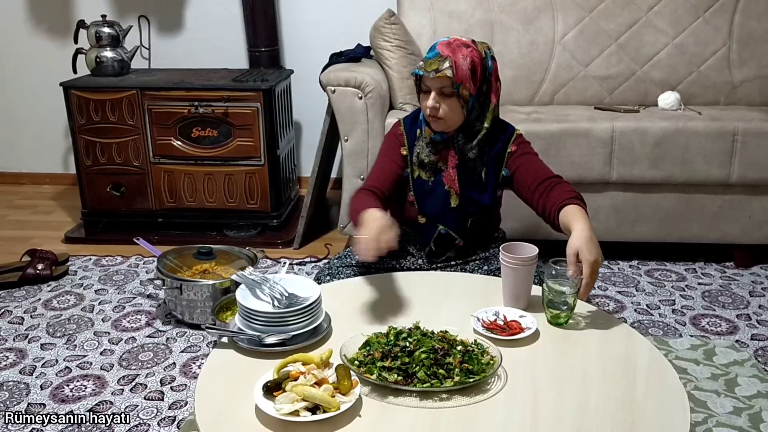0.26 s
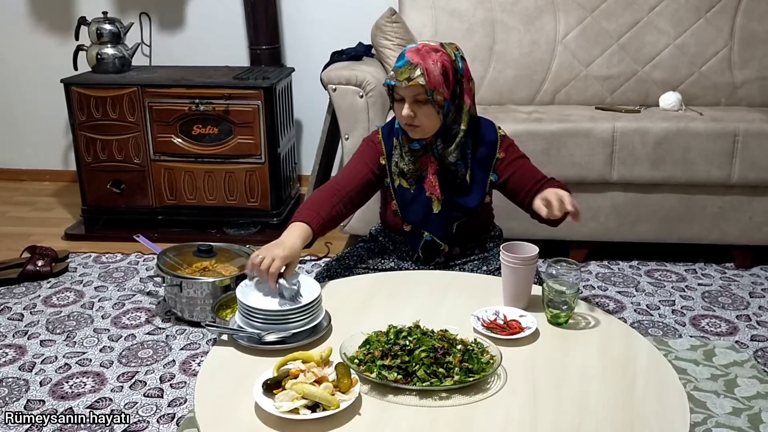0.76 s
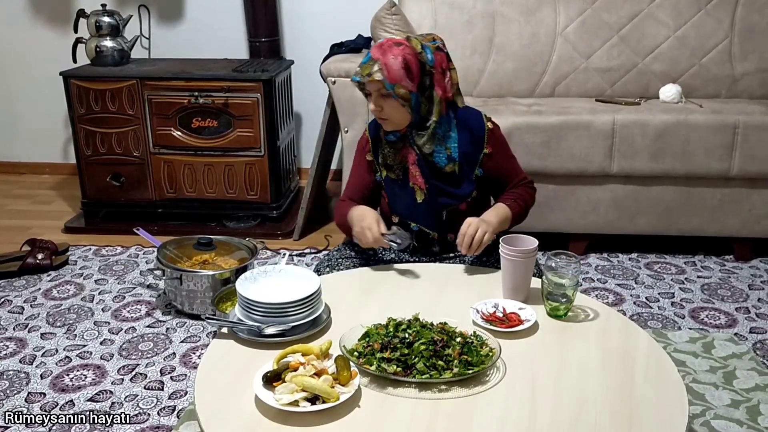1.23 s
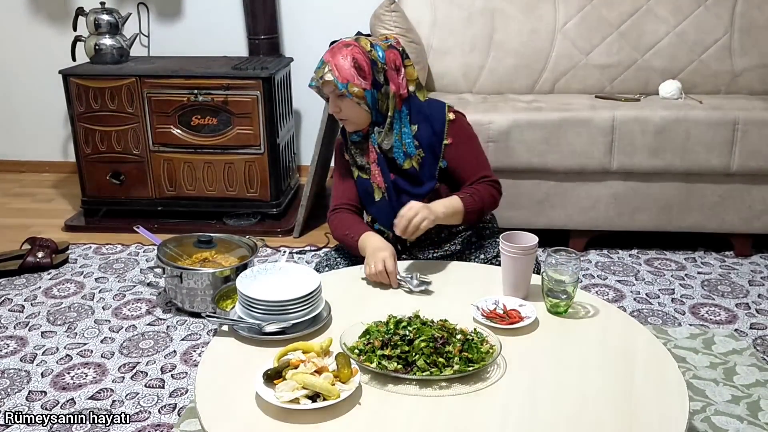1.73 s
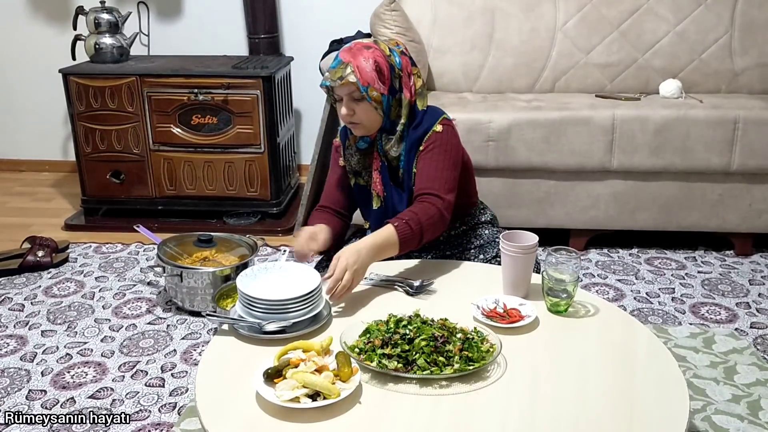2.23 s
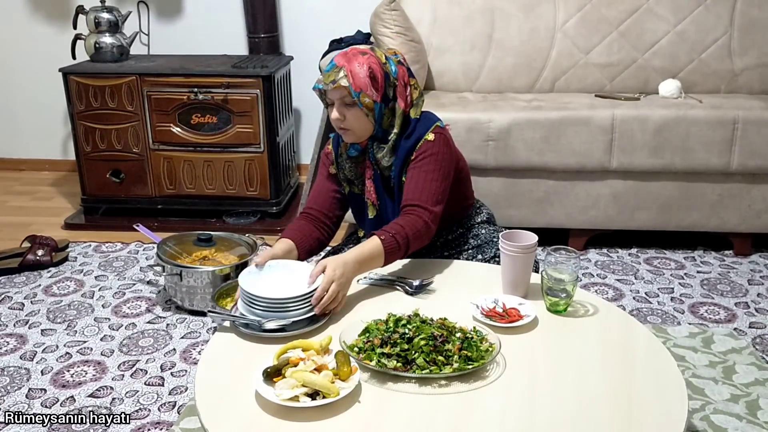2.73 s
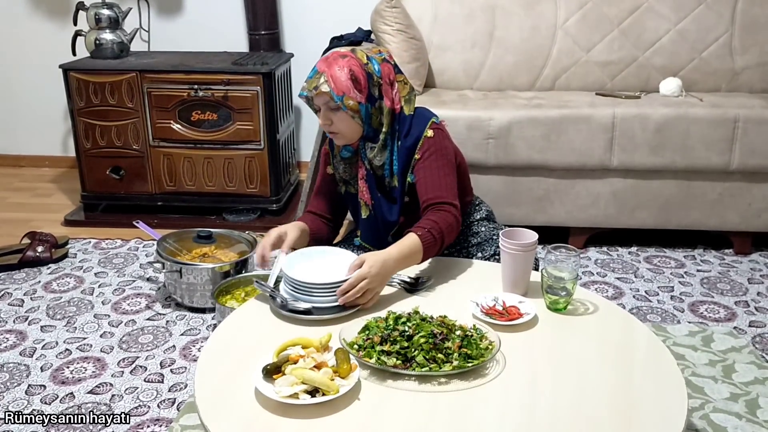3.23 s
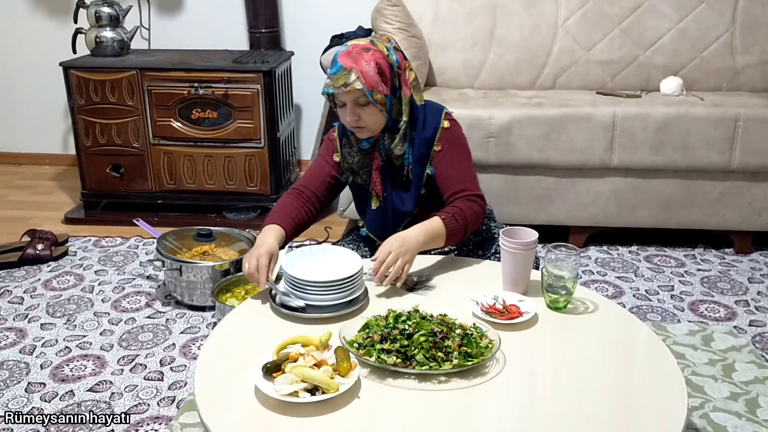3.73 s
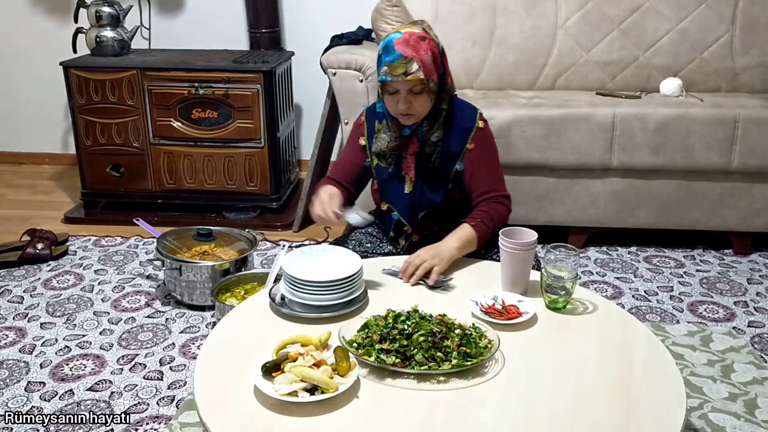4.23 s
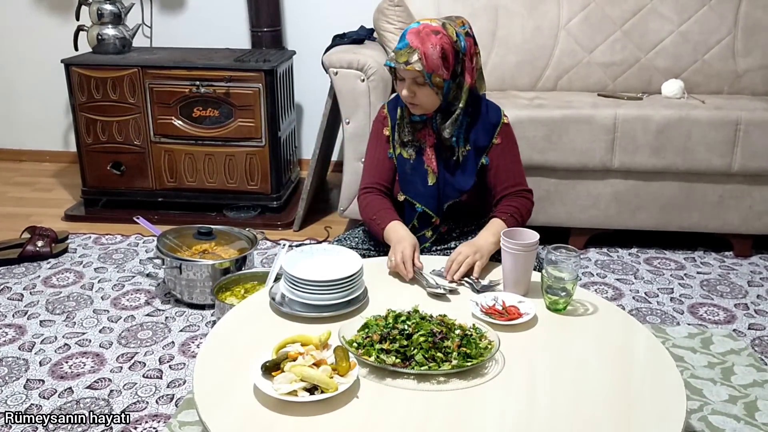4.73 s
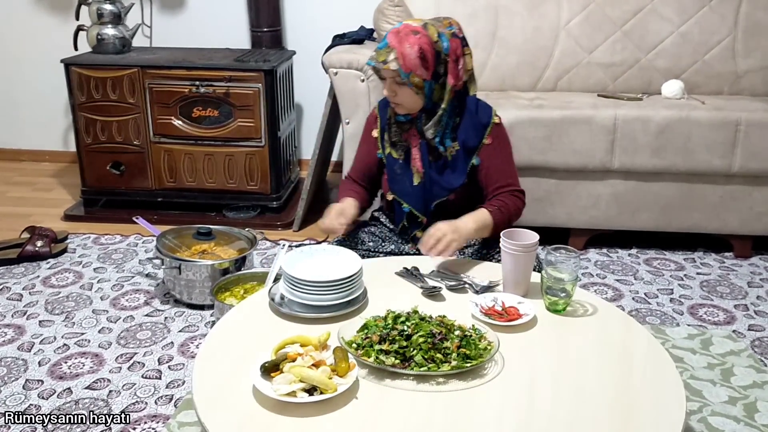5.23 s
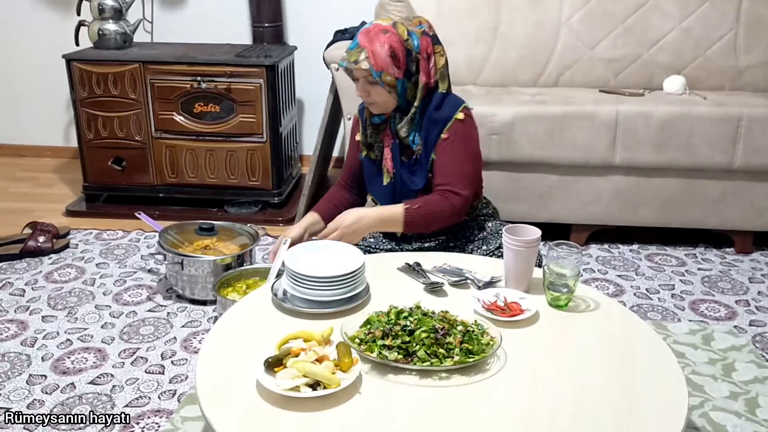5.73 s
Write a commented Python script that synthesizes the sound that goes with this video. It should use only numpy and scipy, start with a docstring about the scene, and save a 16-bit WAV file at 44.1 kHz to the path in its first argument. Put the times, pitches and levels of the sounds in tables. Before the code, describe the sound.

In a quiet carpeted living room, a cup and a glass knock on a low wooden table. A fistful of cutlery is scooped off a plate with a bright jangle, then dropped in several hard clacks. A stack of plates slides softly, a spoon scrapes free, and the cutlery is sorted with ringing clatter. One close microphone, short room echo, faint hiss.

```python
"""Laying tableware on a low table

One microphone in a carpeted room, near a low wooden table. A cup and a glass knock, a fistful of cutlery
is scooped off a plate, dropped and sorted, a stack of plates slides and a spoon is drawn off the tray.
Each contact is a burst of tiny impacts that thumps the surface, rasps on it and rings what is moved.
Blows, clinks, ticks, hums and a groan are added over room tone. Table levels are before the mix in scene()."""
import sys
import numpy as np
from scipy import signal
from scipy.io import wavfile
from scipy.ndimage import uniform_filter1d

SR = 44100
rng = np.random.default_rng(int(sys.argv[2]) if len(sys.argv) > 2 else 0)


def generate_wav(sig):
    """Save sig (samples, or channels by samples) to the path in sys.argv[1] as 16-bit PCM at SR."""
    pcm = np.round(np.clip(np.atleast_2d(sig).T, -1, 1) * 32767).astype(np.int16)
    wavfile.write(sys.argv[1], SR, pcm)


N = 263277  # length, samples


def amp(db):
    """Decibels to amplitude."""
    return 10 ** (np.asarray(db) / 20)


def unit(x):
    """Scales to energy 1."""
    return x / np.sqrt(np.sum(x ** 2) + 1e-20)


def read(points, hz):
    """Reads a table of (hz, value) along a logarithmic frequency axis."""
    f, value = np.transpose(points)
    return np.interp(np.log(hz + 1), np.log(f + 1), value)


def played(x, response):
    """Sends a signal through an impulse response."""
    return signal.oaconvolve(x, response)[:N]


def bandpass(x, order, band_hz):
    """Keeps one band of a signal."""
    return signal.sosfilt(signal.butter(order, band_hz, "band", fs=SR, output="sos"), x)


def colour(points, size=2048):
    """Causal, minimum-phase response with the given spectrum, at energy 1."""
    level_db = np.maximum(read(points, abs(np.fft.fftfreq(size, 1 / SR))), -100)
    log_gain = np.log(amp(level_db))
    response = np.fft.ifft(np.exp(np.conj(signal.hilbert(log_gain)))).real
    return unit(response[:size // 2])


def ring(modes):
    """Dying sines of three like pieces, slightly out of tune; a wide resonance dies fast and starts stronger."""
    hz, width, db = np.transpose(modes)[:, :, None]
    t = np.arange(SR // 4) / SR
    pieces = sum(np.sin(2 * np.pi * (hz + step * width) * t) for step in (-1, 0, 1))
    sound = (amp(db) * width * np.exp(-np.pi * width * t) * pieces).sum(0)
    no_bass = signal.butter(2, 1500, "high", fs=SR, output="sos")  # small things radiate no bass
    return unit(signal.sosfilt(no_bass, sound))


def impacts(per_s, spread_db):
    """Tiny impacts at random moments, a few of them larger; mean power 1."""
    size = amp(spread_db * np.minimum(rng.exponential(1, N), 4)) * rng.choice([-1., 1.], N)
    happens = rng.random(N) < per_s / SR
    return np.sqrt(N) * unit(size * happens)


RISE_POWER = 0.64  # shape of the rise, 1 = straight
# How fast each layer dies: one factor on the fall for thump, rasp and ring
FALL_PACE = [
    [0.86],
    [0.76],
    [.95],
]


def stroke(t, start, rise, hold, fall_db, *levels_db):
    """Rise, hold and fall of one contact's force, each layer dying at its own pace."""
    age = t - start
    fading_db = np.maximum(age - rise - hold, 0) * fall_db * np.array(FALL_PACE)
    return np.clip(age / rise, 0, 1) ** RISE_POWER * amp(np.array(levels_db)[:, None] - fading_db)


def contact(rows, surface, modes, clatter, ring_share, per_s):
    """Impacts shaped by each stroke drive the surface, low and high, and the moved thing."""
    t, power = np.arange(SR) / SR, np.zeros((3, N + SR))
    for start, *row in rows:
        power[:, round(start * SR):][:, :SR] += stroke(t, 0, *row) ** 2
    thump, rasp, jangle = np.sqrt(power[:, :N]) * impacts(per_s, spread_db=1.5)
    # the moved thing: pitched ring and unpitched clatter, shared by power
    thing = np.sqrt(ring_share) * ring(modes)
    thing[:1024] += np.sqrt(1 - ring_share) * colour(clatter)
    return played(thump, colour(surface[0])) + played(rasp, colour(surface[1])) + played(jangle, thing)


# Room tone: hz, level_db per Hz (shape only)
HISS = [(18, -30), (30, -1), (197, -13), (256, -15), (432, -22.5), (492, -21), (546, -26), (622, -21.5),
        (1680, -27.5), (2490, -28.5), (6540, -37), (15500, -36.5)]
HISS_DB = -70.5  # room tone level
WANDER_DB, RUMBLE_DB = -66.5, -79  # very low wander and low rumble at rest
# Swells added to the resting levels: centre_s, half_width_s, wander_db, rumble_db
SWELLS = [(.8, 0.13, -50, -78.5), (2.2, 0.46, -70, -69), (3.04, 0.038, -52, -72), (4.12, 0.13, -62, -84),
          (4.62, .1, -54.5, -75), (5.14, 0.19, -44, -66.5), (5.521, 0.18, -50.5, -61)]


def background():
    """Steady noise for room tone; a very low, near inaudible wander and a low rumble that swell at times."""
    out = amp(HISS_DB) * played(rng.standard_normal(N), colour(HISS, size=8192))
    centre, half, *levels = np.transpose(SWELLS)[:, :, None]
    bells = np.exp(-((np.arange(N) / SR - centre) / half) ** 2)
    for rest_db, db, band_hz in zip((WANDER_DB, RUMBLE_DB), levels, ([1.5, 10], [32, 58])):
        low = bandpass(rng.standard_normal(N), 3, band_hz)
        level = amp(rest_db) + (amp(db) * bells).sum(0)
        out += np.sqrt(N) * unit(low) * level
    return out


# Cup and glass: start_s, rise_s, hold_s, fall_db_per_s (before FALL_PACE), thump_db, rasp_db, ring_db
CUP_STROKES = [(0.0, 0.00033, .001, 397, -42, -40.5, -55), (.121, 0.0019, .001, 253.5, -40.5, -37.5, -51),
               (.124, 0.006, 0.0089, 457, -49.5, -39, -35), (.224, 0.0017, 0.0067, 356, -38.5, -41.5, -72)]
# Surface under them, a thump list then a rasp list: hz, level_db per Hz (shape only)
STAND = [(59, -46.5), (100, -18.5), (214, -1.5), (393, -10.5), (445, -4), (540, -2.5), (606, 1),
         (1000, -12.5), (1300, -46), (2200, -120)], [(530, -16), (900, -10.5), (1040, -7.5), (1180, -9.5),
         (1680, -8), (2330, -2), (2800, -4), (3200, -17), (4160, -21.5), (7040, -120)]
# Their ring: hz, width_hz, level_db (shape only, weighted by width in ring())
CUP_MODES = [(5130, 32, 2.5), (5530, 28, -17), (5820, 260, -12.5), (7580, 110, -13), (8420, 43, -7.5),
             (10460, 39, -23.5), (12040, 50, -17), (12500, 80, -20), (12930, 37, -11), (13500, 25, -4),
             (15030, 94, -26.5), (15270, 90, -39)]
# Their unpitched clatter: hz, level_db per Hz (shape only)
CUP_CLATTER = [(1940, -37), (3300, -21), (5090, -3), (6810, -19.5), (7650, -2), (9790, -26.5), (13100, -6),
               (15500, -30)]


def cups():
    """A cup and a glass knock: very quick strokes, mostly pitched ring in the moved thing."""
    return contact(CUP_STROKES, STAND, CUP_MODES, CUP_CLATTER, ring_share=0.69, per_s=4000)


# Short pitched clinks and knocks that stand out of the clatter: start_s, pitch_hz, width_hz, level_db, t60_s
CLINKS = [(.0, 2747, 62, -43.5, 0.12), (.128, 2414, 173.6, -28, 0.21), (.14, 2460, 102, -25, 0.084),
          (.127, 708, 76, -39, 0.19), (.688, 840, 60, -54, .2), (.71, 892, 90, -43, 0.35),
          (.728, 5250, 109, -26.5, 0.09), (.728, 7240, 64.8, -23.5, 0.054), (1.706, 7410, 100, -70.5, .2),
          (1.814, 1620, 142, -34.5, 0.21), (1.814, 716, 123.1, -39, 0.064), (1.878, 1580, 140, -36.5, 0.11),
          (1.969, 2814, 374, -25, 0.082), (1.975, 7430, 93, -41, .12), (2.035, 5780, 86.4, -40.5, 0.086),
          (2.093, 1415, 96, -33, 0.12), (2.1, 155, 30, -57, 0.36), (2.15, 476, 28.7, -36.5, 0.12),
          (2.77, 890, 121, -52.5, 0.12), (2.76, 7850, 120, -67, 0.068), (3.139, 481, 50, -48, .1),
          (3.43, 651, 112.2, -50, 0.068), (3.672, 844, 91, -42.5, 0.082), (3.77, 3450, 153, -48, 0.34),
          (3.81, 2476, 152, -44.5, 0.23), (3.83, 3686, 163, -45, 0.22), (4.07, 1633, 102, -31, 0.089),
          (4.05, 11200, 148, -37, 0.41), (4.07, 7450, 83, -38, 0.19), (4.35, 3150, 129, -40, 0.4),
          (4.45, 2340, 223.6, -38.5, 0.48), (4.612, 9600, 140.4, -42, 0.089),
          (4.659, 3440, 248, -30.5, 0.049), (4.712, 2660, 481.5, -33, 0.048),
          (4.715, 330, 40, -47.5, 0.094), (4.81, 321, 56, -38, 0.06), (4.929, 2960, 433, -21.5, 0.053),
          (4.94, 4800, 30, -45, 0.505), (4.95, 8740, 62.04, -47, 0.84), (5.011, 3200, 121, -33, .1),
          (5.05, 7780, 61.11, -34, 0.31), (5.469, 120, 35, -61, 0.42)]


def clinks():
    """Each is a cluster of ten close tones that starts fast and dies, like a damped mode shaken for a moment."""
    out, t = np.zeros(N), np.arange(SR // 3) / SR
    spreads = rng.uniform(-1, 1, (len(CLINKS), 2, 10, 1))
    for (start, hz, width, db, t60), (detune, phase) in zip(CLINKS, spreads):
        tones = np.sin(2 * np.pi * (hz + width * detune) * t + np.pi * phase).sum(0) / np.sqrt(5)  # mean power 1
        out[round(start * SR):][:len(t)] += amp(db - 60 * t / t60) * (1 - np.exp(-t / 0.0017)) * tones
    return out


# Carpeted room: hz, t60_s
ROOM = [(200, .45), (700, 0.33), (2000, 0.28), (5000, 0.31), (12000, 0.26)]


def room(x):
    """Sparse echoes of random sign, each band dying at its own speed."""
    taps = np.zeros(SR // 2)
    slots = np.arange(100, len(taps) - 12, 12)  # one echo in every 12 samples
    taps[slots + rng.integers(0, 12, len(slots))] = rng.choice([-1., 1.], len(slots))
    hz, t, bands = signal.stft(taps, SR, nperseg=256)
    dying = bands * amp(-60 * t / read(ROOM, hz)[:, None])
    return played(x, unit(signal.istft(dying, SR, nperseg=256)[1]))


# Faint ticks of cutlery in the hands: start_s, level_db, body_db (relative to the treble), t60_s
TICKS = [(0.5154, -55.5, -10, 0.01), (0.5407, -48, -1, 0.02), (1.0394, -70, -3.5, 0.012),
         (1.119, -74, -6, 0.011), (2.437, -43, -7, 0.012), (3.461, -57, -7, 0.011), (1.3476, -42, -31, 0.2),
         (1.353, -40, -33, 0.2), (1.4361, -45.5, -23.5, 0.18), (1.443, -45, -16, 0.17),
         (1.7115, -52, -20, 0.24), (1.7779, -53, -21, 0.2)]
# Their treble: hz, level_db per Hz (shape only)
TICK_CLATTER = [(880, -55), (1500, -19), (3720, -29), (5670, -3), (6250, -17), (7900, 4), (8970, -7.5),
                (15500, 3)]
# Wooden table top, a thump list then a rasp list: hz, level_db per Hz (shape only)
TABLE = [(59, -40.5), (100, -16), (257, -7), (303, -6), (350, 4), (393, -2), (467, 5.5), (648, 0.5),
         (1000, 0.5), (1300, -25), (2200, -120)], [(530, -27.5), (900, -12), (1040, 1), (1290, -4),
         (1560, 1.5), (1750, 1), (2260, 4), (3190, 0), (4070, -15), (4500, -21), (5850, -36), (9900, -120)]


def ticks():
    """Light touches of steel on steel: a click and a short fizzing tail."""
    high, low = np.zeros((2, N))
    t = np.arange(SR // 8) / SR
    fizzes = rng.standard_normal((len(TICKS), len(t)))
    for (start, db, body_db, t60), fizz in zip(TICKS, fizzes):
        touch = amp(db - 17.0 - 60 * t / t60) * fizz
        touch[0] = amp(db + 6.0)  # the click
        high[round(start * SR):][:len(t)] += touch
        low[round(start * SR):][:len(t)] += amp(body_db) * touch
    return played(high, colour(TICK_CLATTER)) + played(low, colour(TABLE[1]))


# Scoop off the plate: start_s, rise_s, hold_s, fall_db_per_s (before FALL_PACE), thump_db, rasp_db, ring_db
SCOOP_STROKES = [(.678, .012, .011, 297.5, -71.5, -62, -49.5), (.69, 0.011, .001, 300, -60, -51, -37),
                 (.706, 0.0041, 0.014, 299.5, -57.5, -47.5, -25),
                 (.722, 0.0098, 0.06, 270, -55.5, -41.5, -21), (.727, 0.0028, .001, 800, -35.5, -49, -38.5),
                 (.93, 0.0076, .011, 400, -61, -55.5, -55)]
# Plate under the cutlery, a thump list then a rasp list: hz, level_db per Hz (shape only)
PLATE = [(120, -76), (200, -30), (394, -28.5), (481, -2.5), (555, -9), (1100, 8), (1430, -24.5),
         (2420, -120)], [(590, -29.5), (1000, -3), (1460, -26), (1740, -2), (2220, 7), (2440, -2),
         (3200, -6), (4160, -32), (7040, -120)]
# Scooped cutlery's ring: hz, width_hz, level_db (shape only, weighted by width in ring())
SCOOP_MODES = [(3763, 130, -4), (5210, 52, -15.5), (5340, 20, -6), (6220, 37, -2.5), (7180, 61, -3.5),
               (8830, 55, -11), (9570, 78, -10), (11220, 36, 1.5), (11900, 75, -4.5), (12300, 33, -6.5),
               (12500, 22, -6), (13700, 47.8, -5), (14000, 24, -0.5), (13700, 63, 2.5), (14400, 42, -3.5),
               (14900, 27, -13), (14600, 57, -2), (14870, 46, -3)]
# Its unpitched clatter: hz, level_db per Hz (shape only)
SCOOP_CLATTER = [(1470, -50), (2500, -15), (3660, 3.5), (4750, -16), (5160, -10.5), (9510, -8),
                 (10300, -19.5), (10900, -8), (15500, -1)]


def scoop():
    """A fistful of cutlery is scooped off a plate: the strokes drive the plate and the ringing steel."""
    return contact(SCOOP_STROKES, PLATE, SCOOP_MODES, SCOOP_CLATTER, ring_share=0.59, per_s=5000)


# Single sharp blows at the head of a contact: start_s, level_db, brightness_db (treble relative to level_db)
BLOWS = [(0.7274, -22.5, 1.5), (1.8128, -11, -39), (1.8761, -14, -19), (1.9684, -15, -16),
         (2.1594, -34.5, -8), (3.671, -38, 3), (4.0412, -50, -1), (4.2668, -39, -6), (4.0725, -16, -17),
         (4.6109, -40.5, -9), (4.6583, -8.5, -17), (4.7117, -24.5, -14), (4.808, -33, 3),
         (4.9282, -21, -2.5)]
# Unpitched clatter of steel, also of the sorted cutlery: hz, level_db per Hz (shape only)
SORT_CLATTER = [(2060, -26), (3500, -11.5), (4460, -20), (5900, -11), (6610, -21), (7620, -6),
                (10500, -8.5), (13000, 1), (15500, -8)]


def blows():
    """Each is one hard click: the table's rasp colour below, steel above."""
    low, high = np.zeros((2, N))
    for start, db, bright_db in BLOWS:
        low[round(start * SR)] = amp(db)
        high[round(start * SR)] = amp(db + bright_db)
    return played(low, colour(TABLE[1])) + played(high, colour(SORT_CLATTER))


# Pieces that keep humming after a heap settles (cutlery, plates, table top): pitch_hz, level_db, t60_s
SCOOP_HUM = [(2220, -44, .6), (3710, -50, .38), (5350, -38.5, 0.2), (6160, -37.5, 0.44), (7092, -41, .28),
             (11200, -51.5, .34)]
PLATE_HUM = [(1070, -63.5, 1.87), (1880, -58, .4), (2114, -63.5, 1.3), (2330, -61.5, 1.6), (2530, -60, 1.1),
             (2570, -60, 0.73), (3725, -74, 1.7), (4700, -81, 1.35), (8100, -58, .34), (9308, -68.5, 1.6),
             (10900, -53, .35), (12380, -70, 0.55)]
TOP_HUM = [(350, -42.5, 0.5)]
SORT_HUM = [(1820, -51, 0.27), (2030, -68, 1.8), (4770, -35, .24)]
# When they hum: start_s, which of the lists above
HUM_STARTS = [(.755, SCOOP_HUM), (2.2, PLATE_HUM), (4.06, TOP_HUM), (5.097, SORT_HUM)]


def hums():
    """Slowly dying tones with a soft start."""
    t = np.arange(N) / SR
    out = np.zeros(N)
    for start, modes in HUM_STARTS:
        age = np.maximum(t - start, 0)
        for hz, db, t60 in modes:
            out += amp(db - 60 * age / t60) * (1 - np.exp(-age / 0.022)) * np.sin(2 * np.pi * hz * t)
    return out


# Drop on the table: start_s, rise_s, hold_s, fall_db_per_s (before FALL_PACE), thump_db, rasp_db, ring_db
DROP_STROKES = [(1.812, 0.00084, 0.00087, 3000, -34, -33, -38),
                (1.813, 0.0051, 0.018, 500, -44, -38, -30.5), (1.874, 0.0028, .001, 180, -49, -40.5, -37.5),
                (1.966, 0.01, 0.017, 130, -43.5, -34, -28.5), (2.09, 0.0038, .001, 700, -35.5, -31, -31.5),
                (2.098, 0.014, 0.082, 600, -46, -32.5, -27.5)]
# Dropped cutlery's ring: hz, width_hz, level_db (shape only, weighted by width in ring())
DROP_MODES = [(5960, 41, -13.5), (6450, 46, -18), (6800, 20, -29), (7760, 69, -6), (8500, 20, -4),
              (8600, 176, -11.5), (9030, 59, -5), (9630, 66, -6.5), (11210, 126, -4.5), (12700, 110, -20),
              (13240, 64, -5.5), (13930, 39, 1), (14560, 120, -4), (14200, 32, -9), (14740, 84, -4)]
# Its unpitched clatter: hz, level_db per Hz (shape only)
DROP_CLATTER = [(2060, -54.5), (3500, -12.5), (5310, -19), (9480, -5), (10300, -12.5), (10900, -20),
                (12500, 1), (13300, 6), (15500, -8)]


def drop():
    """The cutlery is dropped: quick strokes thump the table top and jangle the steel."""
    return contact(DROP_STROKES, TABLE, DROP_MODES, DROP_CLATTER, ring_share=0.49, per_s=3600)


# Hands between jobs: start_s, rise_s, hold_s, fall_db_per_s (before FALL_PACE), thump_db, rasp_db, treble_db
RUSTLE_STROKES = [(2.48, 0.052, .2, 200, -79, -74, -80.5), (5.25, 0.014, .001, 100, -74, -75, -93),
                  (5.3, 0.04, .3, 100, -76.5, -76.5, -86)]
# Surface under the stack, a thump list then a rasp list: hz, level_db per Hz (shape only)
STACK = [(59, -41), (100, 1), (183, -18.5), (257, -2), (408, -3), (535, 2.5), (667, 0.5), (1000, -21),
         (1300, -19), (2200, -120)], [(530, -16), (900, -4.5), (1120, -3), (1240, -10.5), (1400, -2.5),
         (1540, -6), (2640, -5), (4500, -26), (5850, -33), (9900, -120)]
# Plates' ring: hz, width_hz, level_db (shape only, weighted by width in ring())
SLIDE_MODES = [(3770, 21, -2), (5450, 40, -10), (7180, 59, -18.5), (7950, 38, -16), (13900, 74, -23),
               (15300, 59, -4)]
# Their unpitched clatter: hz, level_db per Hz (shape only)
SLIDE_CLATTER = [(2060, -37), (3500, -6.5), (4060, -12), (5900, -8.5), (8010, -6), (9300, -13.5),
                 (11200, -14), (14000, -6.5), (15500, -13.5)]


def rustle():
    """A faint rustle as the hands move between jobs: weak strokes with no pitched ring."""
    return contact(RUSTLE_STROKES, STACK, SLIDE_MODES, SLIDE_CLATTER, ring_share=0, per_s=5000)


# Sliding stack: start_s, rise_s, hold_s, fall_db_per_s (before FALL_PACE), thump_db, rasp_db, ring_db
SLIDE_STROKES = [(2.74, 0.033, .001, 220, -63, -52.5, -65), (2.875, 0.022, .001, 130, -64.5, -54, -63),
                 (2.95, .16, 0.013, 92, -57, -50.5, -64), (3.13, 0.049, 0.094, 450, -63, -57, -66.5),
                 (3.428, 0.0052, 0.00063, 506, -70, -62, -88), (3.45, 0.022, 0.1, 300, -73, -74, -83)]


def slide():
    """A stack of plates slides: mostly slower strokes, nearly all unpitched clatter in the plates."""
    return contact(SLIDE_STROKES, STACK, SLIDE_MODES, SLIDE_CLATTER, ring_share=0.078, per_s=4400)


# Droning table top under the stack: start_s, rise_s, hold_s, fall_db_per_s (before FALL_PACE), level_db
GROANS = [(3.135, 0.013, 0.12, 500, -58)]
# Its bands: pitch_hz, width_hz, level_db (relative)
GROAN_TONES = [(261, 29, 1), (552, 43, -4)]


def groan():
    """Steady friction noise in two narrow bands, near 261 and 552 Hz."""
    out, rub = np.zeros(N), rng.standard_normal(N)
    for hz, width, db in GROAN_TONES:
        tone = bandpass(rub, 2, [hz - width / 2, hz + width / 2])
        loudness = np.sqrt(abs(uniform_filter1d(tone ** 2, size=4000)) + 1e-12)
        out += amp(db) * tone / loudness
    return out * sum(stroke(np.arange(N) / SR, *row)[0] for row in GROANS)


# Spoon off the tray: start_s, rise_s, hold_s, fall_db_per_s (before FALL_PACE), thump_db, rasp_db, ring_db
LIFT_STROKES = [(3.665, 0.014, .015, 280, -57.5, -44, -35.5), (3.75, 0.099, .001, 231, -61.5, -46.5, -47)]
# Its unpitched clatter: hz, level_db per Hz (shape only)
LIFT_CLATTER = [(2060, -29), (3500, -3.5), (4490, -9.5), (4870, -4), (6480, -4.5), (9420, -9.5),
                (14600, -7.5), (15500, -6)]
# Ring of spoon and sorted cutlery: hz, width_hz, level_db (shape only, weighted by width in ring())
SORT_MODES = [(4760, 10, -18.5), (6700, 200, -53), (7410, 21, -3), (7900, 110, -5.5), (8330, 59, -2.5),
              (8920, 21, -2.5), (8860, 55, -18.5), (10000, 165, -9.5), (10240, 34, -11), (11960, 59, -13.5),
              (12500, 35, -7), (11600, 44, -10), (12300, 45.3, -27), (13250, 44, -10), (13880, 166, 0.5),
              (14100, 142, -35), (15100, 50, 9.5), (15600, 37, -15)]


def lift():
    """A spoon is drawn off the tray under the plates: two strokes, mostly clatter in the steel."""
    return contact(LIFT_STROKES, TABLE, SORT_MODES, LIFT_CLATTER, ring_share=0.2, per_s=4600)


# Sorting: start_s, rise_s, hold_s, fall_db_per_s (before FALL_PACE), thump_db, rasp_db, ring_db
SORT_STROKES = [(4.035, 0.0017, .004, 300, -58, -58, -39), (4.04, 0.0021, 0.047, 200, -57, -38, -35.5),
                (4.066, 0.014, 0.015, 316, -43.5, -34.5, -29.5), (4.17, .09, 0.019, 200, -47, -40, -48.5),
                (4.266, 0.0091, 0.048, 150.3, -53, -45.5, -39.5), (4.28, 0.12, 0.06, 120, -43, -36.5, -34),
                (4.608, 0.005, 0.0086, 350, -44, -35.5, -33.5),
                (4.656, 0.0071, 0.0042, 208.3, -44.5, -37.5, -36.5),
                (4.709, 0.0057, 0.0024, 462, -38, -24.5, -24), (4.805, 0.008, 0.017, 100, -49.5, -40, -26),
                (4.924, 0.0056, .001, 500, -49, -51, -26), (4.926, 0.037, .12, 245.5, -48.5, -36, -25.5),
                (5.925, .015, 0.044, 100, -78, -65, -67)]


def sort():
    """The cutlery is sorted on the table: many strokes, about half ring and half clatter in the steel."""
    return contact(SORT_STROKES, TABLE, SORT_MODES, SORT_CLATTER, ring_share=0.54, per_s=5000)


def scene():
    """Mixes the near sounds, their echoes and the unechoed layers, alike on two channels."""
    near = cups() + clinks() + scoop() + blows() + drop()
    near += rustle() + slide() + groan() + lift() + sort()
    mono = amp(-2) * near + amp(-9.0) * room(near) + ticks() + hums() + background()
    return np.array([mono, mono])


EDGE_HZ = 15600  # top of the band


def record(dry):
    """Limits the band with a steep low-pass."""
    low_pass = signal.firwin(1023, EDGE_HZ, window=("kaiser", 9), fs=SR)
    return signal.oaconvolve(dry, low_pass[None], "same")


dry = scene()
out = record(dry)
generate_wav(out)
```